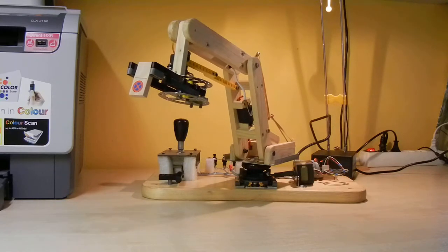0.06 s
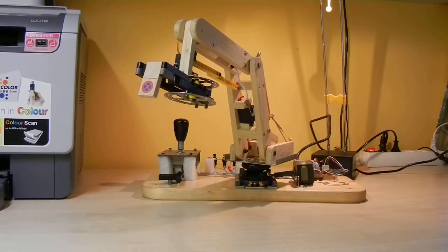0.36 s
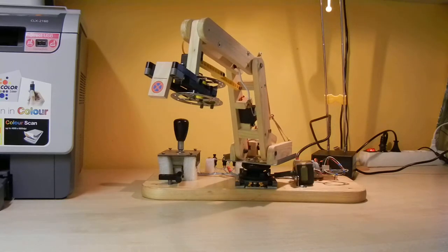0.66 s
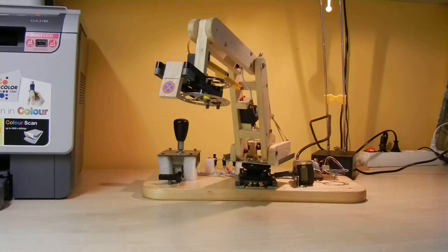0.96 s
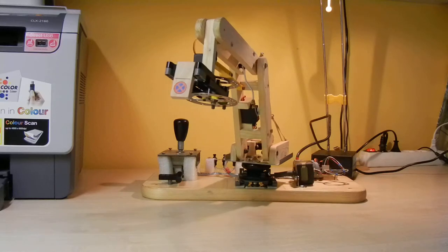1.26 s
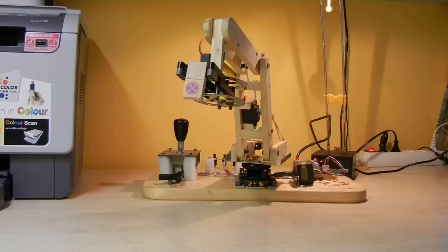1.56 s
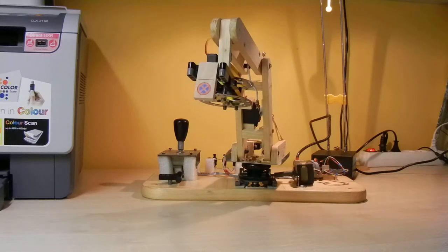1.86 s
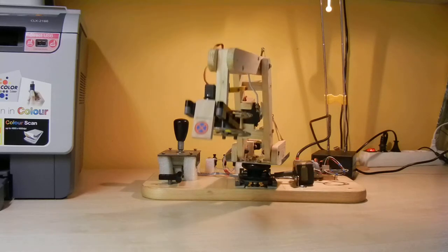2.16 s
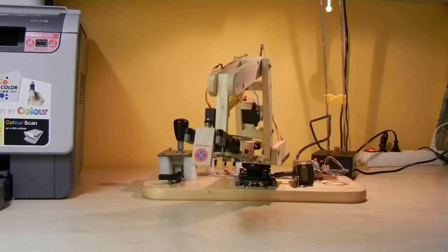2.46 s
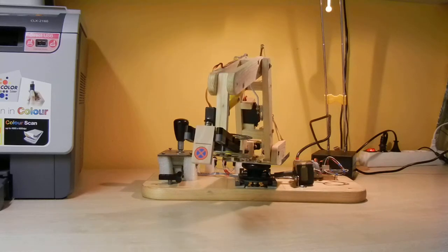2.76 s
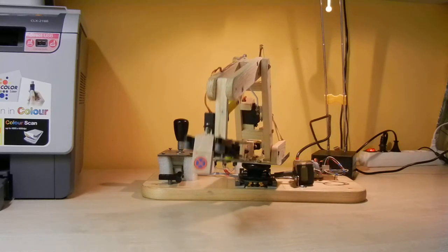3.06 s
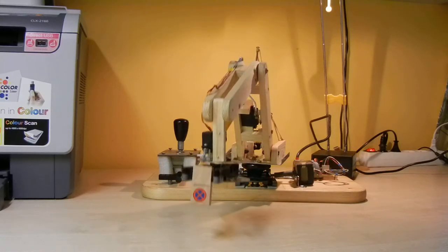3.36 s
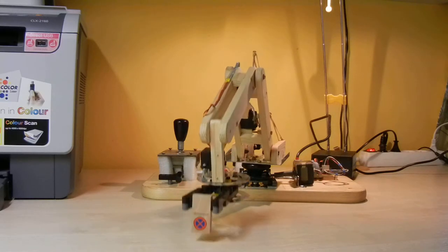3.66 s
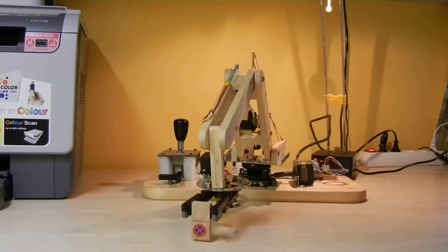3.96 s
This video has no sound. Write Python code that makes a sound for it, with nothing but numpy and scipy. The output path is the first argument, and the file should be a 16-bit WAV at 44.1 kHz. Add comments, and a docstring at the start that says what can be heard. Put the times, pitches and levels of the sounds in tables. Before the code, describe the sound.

A small robot arm buzzes softly and steadily as it turns, with a few faint ticks, stopping with a soft low thud at about 1.9 seconds. Its gears whir with a slightly rising whine until 2.6 seconds. Light ticks and brief whirs follow. Near 3.9 seconds the gripper knocks sharply on the table and bounces once, with a short room echo. Faint hiss and electrical hum continue throughout.

```python
"""On a desk in a small room, a little wooden robot arm works over hiss and mains hum.
Its base motor buzzes while it turns and stops with a soft thud. Then the gears of its servos
(the small motors in the joints) whir and the joints tick as the arm drops.
The gripper knocks on the table and bounces once; the desk and the room throw the knock back."""
import sys
import numpy as np
from scipy import signal
from scipy.fft import rfft, irfft
from scipy.io import wavfile

SR = 44100
rng = np.random.default_rng(int(sys.argv[2]) if len(sys.argv) > 2 else 0)


def generate_wav(signal):
    """Clip the signal to [-1, 1] and save it as 16-bit WAV at the path in sys.argv[1]."""
    frames = np.transpose(np.atleast_2d(signal))
    scaled = np.clip(frames, -1, 1) * 32767
    pcm = np.round(scaled).astype(np.int16)
    wavfile.write(sys.argv[1], SR, pcm)


N = 176400  # 4 seconds

STEP_HZ, STEP_JITTER, TURN_END_S, RUN_DOWN_S = 76.34, .0018, 1.937, .025
BUZZ_DB, BUZZ_RISE_DB_PER_S, RASP_DB = -57.5, .14, -59
# The tones in the buzz. Each row: multiple of the step rate, level in dB relative to BUZZ_DB.
BUZZ_TONES = [(1, -19.5), (2, -7.5), (3, -9), (4, 1), (5, -8.5), (6, -2.5), (7, -8.5), (8, -12), (9, -18.5),
              (10, -13.5), (11, -6.5), (12, -12.5), (19, -19.5), (21, -4), (22, -10.5), (23, -13),
              (24, -11.5), (25, -10.5), (38, -16)]
# The colour of the rasp. Each row: frequency in Hz, relative level in dB.
RASP_COLOUR = [(60, -39), (170, 3.5), (480, 8), (1100, 1), (1700, 11.5), (2100, 5.5), (2900, -2.5),
               (4500, -39.5), (15000, -57)]
def base_motor():
    """The motor moves in even steps, which make a buzz and a rasp that pulses with each step."""
    t = np.arange(N) / SR
    phase = 2 * np.pi * np.cumsum(STEP_HZ * (1 + STEP_JITTER * drift(6.7))) / SR
    buzz = 0
    for multiple, db in BUZZ_TONES:
        wavering = np.sqrt(2) * from_db(db + 1.5 * drift(5.8))
        buzz += wavering * np.sin(multiple * phase + rng.uniform(0, 2 * np.pi))
    buzz *= from_db(BUZZ_DB + BUZZ_RISE_DB_PER_S * (t - TURN_END_S / 2))
    pulses = 1 + .4 * np.cos(phase / 2) ** 4
    rasp = from_db(RASP_DB) * rms_one(noise(RASP_COLOUR, alike=.22) * pulses)
    running = np.clip((TURN_END_S - t) / RUN_DOWN_S + .5, 0, 1)
    return running * (buzz + rasp)


def stop_thud(start_s=1.926, jolt_db=15.5, ring_hz=141, width_hz=6):
    """The frame gives a soft, low shudder as the base stops."""
    return resonate(clicks([(start_s, jolt_db)]), [(ring_hz, width_hz, 0)])


# The gripper's two hits. Each row: start in seconds, strength in dB, cut-off in Hz (lower is softer).
GRIPPER_HITS = [(3.858, 5, 5260), (3.9595, -3.5, 2800)]
# How the gripper and table ring. Each row: pitch in Hz, width in Hz (wider dies sooner), level in dB.
WOOD_RINGS = [(548, 84, 3), (770, 230, -4.5), (1080, 190, -2.5), (1280, 60, -2), (1537, 98, 6.5),
              (2010, 137, 6), (2350, 120, -2), (2590, 83, 6), (3300, 100, 1), (4760, 350, -22),
              (5600, 200, -11), (6400, 140, -25)]
def gripper_knocks():
    """Each hit is a sharp crack and a short wooden ring, followed by near echoes and a duller room."""
    force = sum(butter(clicks([(s, db)]), hz, "low", order=3) for s, db, hz in GRIPPER_HITS)
    crack = from_db(-.5) * butter(force, [1140, 3200], "band")
    ring = from_db(2) * resonate(force, WOOD_RINGS)
    knock = butter(crack + ring, 410, "high")
    near = from_db(5.5) * desk_echoes(knock, alike=.87)
    far = from_db(.5) * room_echoes(butter(knock, 4540, "low"), alike=.91)
    return knock + near + far


def gear_whir(effort, housing, teeth_per_s=6600):
    """Thousands of tiny tooth hits ring a servo's case, louder the harder the servo works."""
    teeth = (rng.random(N) < teeth_per_s / SR) * rng.choice([-1, 1], N)
    teeth = teeth * from_db(3.5 * rng.standard_normal(N))  # no two hits are equally hard
    whir = rms_one(resonate(teeth, housing))
    return whir * from_db(in_time(effort) + .9 * drift(30))


# How hard the shoulder works. Each row: time in seconds, level in dB.
SHOULDER_EFFORT = [(2.225, -83), (2.258, -52), (2.345, -52.5), (2.38, -49), (2.48, -45), (2.55, -48),
                   (2.6, -56), (2.65, -77), (3.57, -80), (3.605, -54), (3.622, -46.5), (3.645, -60),
                   (3.668, -49), (3.72, -72), (3.855, -49.5), (3.872, -41), (3.92, -68), (3.96, -54),
                   (3.985, -53.5)]
# How its case rings. Each row: pitch in Hz, width in Hz, relative level in dB.
SHOULDER_RINGS = [(1700, 1400, -9), (2635, 170, 9), (3660, 160, 2.5), (3950, 300, 2), (5770, 1700, 3),
                  (6850, 270, -10), (8250, 130, -3), (9900, 1600, -3), (12700, 1700, -6.5),
                  (12900, 2300, -3), (15000, 2100, -28)]
def shoulder_servo():
    """The shoulder whirs as it drops the arm and takes the jolt of each knock."""
    return gear_whir(SHOULDER_EFFORT, SHOULDER_RINGS)


# How fast the teeth of the fastest gear meet. Each row: time in seconds, pitch in Hz.
WHINE_PITCH = [(2.25, 5800), (2.4, 6150), (2.5, 6450), (2.6, 6430)]
def gear_whine(width_hz=240):
    """The shoulder's fastest gear sings a rough note and its octave, rising as the arm gains speed."""
    phase = 2 * np.pi * np.cumsum(in_time(WHINE_PITCH)) / SR
    note, octave = (drift(k * width_hz) * np.cos(k * phase) + drift(k * width_hz) * np.sin(k * phase)
                    for k in (1, 2))
    return from_db(in_time(SHOULDER_EFFORT) - 13) * (note + from_db(-9) * octave)


# How hard the elbow works. Each row: time in seconds, level in dB.
ELBOW_EFFORT = [(1.92, -78), (1.985, -57.5), (2.1, -55.5), (2.2, -55.5), (2.4, -52.5), (2.6, -62),
                (2.7, -85)]
# How its case rings. Each row: pitch in Hz, width in Hz, relative level in dB.
ELBOW_RINGS = [(1743, 53, 2), (2250, 350, -3.5), (2630, 290, -3), (3400, 620, -10), (12200, 1300, -9),
               (13900, 1300, -23)]
def elbow_servo():
    """The elbow whirs quietly as it creeps along."""
    return gear_whir(ELBOW_EFFORT, ELBOW_RINGS)


def servos(split_hz=8700):
    """Both servos echo off the desk; their highest sounds reach left and right by different paths."""
    whir = elbow_servo() + shoulder_servo() + gear_whine()
    lows = butter(whir, split_hz, "low", order=3)
    highs = desk_echoes(butter(whir, split_hz, "high", order=3), alike=.3)
    return lows + highs + from_db(-5) * desk_echoes(whir, alike=-.028)


# The slips of the joints. Each row: start in seconds, strength in dB.
JOINT_SLIPS = [(.9995, -35), (1.201, -46), (1.6035, -35.5), (1.7545, -44), (1.98, -45), (2.06, -43),
               (2.205, -39), (2.903, -38.5), (2.908, -52), (3.378, -41), (3.4735, -40), (3.617, -36),
               (3.77, -37.5), (3.774, -43), (3.869, -33)]
def joint_ticks(fade_s=.014):
    """A loose joint slips with a short, gritty tick, also when a knock jolts the arm."""
    decay = from_db(-60 / (fade_s * SR))  # falls 60 dB in fade_s
    slips = signal.lfilter([1], [1, -decay], clicks(JOINT_SLIPS) + 1e-18)
    ticks = butter(slips * rng.standard_normal(N), [900, 8360], "band", order=1)
    echoes = desk_echoes(ticks, alike=-.28) + from_db(-14) * room_echoes(ticks, alike=.2)
    return ticks + from_db(-7) * echoes


# How loud the hum is. Each row: time in seconds, level in dB.
HUM_LEVEL = [(0, -65), (.8, -59), (1.4, -64.5), (1.9, -66), (2.03, -54.5), (2.18, -58), (2.42, -55),
             (2.52, -65), (3.04, -60), (3.13, -52.5), (3.24, -46.5), (3.28, -56), (3.46, -50),
             (3.56, -53.5), (3.63, -50.5), (3.74, -46), (4, -46.5)]
def mains_hum(hum_hz=100):
    """The mains power makes a wavering hum that swells as the arm drops, with faint steady overtones."""
    phase = 2 * np.pi * hum_hz * np.arange(N) / SR
    overtones = sum(np.sin(k * phase + rng.uniform(0, 2 * np.pi)) for k in (4, 7))
    hum = from_db(in_time(HUM_LEVEL) + 2.5 * drift(13)) * np.sin(phase + .11 * drift(1.8))
    return np.sqrt(2) * (hum + from_db(-75) * overtones)


# The colour of the hiss. Each row: frequency in Hz, relative level in dB.
HISS_COLOUR = [(20, -36), (45, -1.5), (75, -0.5), (105, 7), (160, 6), (230, -2), (420, 2.5), (900, -1),
               (1700, 0), (2700, 0), (4500, -9.5), (8000, -11), (15500, -13.5)]
# How wide it sounds. Each row: frequency in Hz, how alike left and right are (1 same, 0 unrelated).
HISS_LIKENESS = [(30, 0.32), (70, 0.36), (130, 0.42), (290, 0.17), (1400, 0.39), (3100, 0.27), (6800, 0.14),
                 (15000, 0.041)]
def room_hiss():
    """A soft, steady hiss fills the room from both sides."""
    return from_db(-51.5) * noise(HISS_COLOUR, per_bin(HISS_LIKENESS))


NEAR_ECHOES_S, ROOM_FADE_S = .0135, .42
def desk_echoes(x, alike):
    """Things on the desk scatter the sound in a brief burst."""
    return diffuse(x, np.ones(int(NEAR_ECHOES_S * SR) + 1), alike)


def room_echoes(x, alike):
    """The room's echoes build up quickly, then fall 60 dB in ROOM_FADE_S."""
    t = np.arange(SR // 2) / SR
    return diffuse(x, np.minimum(t / NEAR_ECHOES_S, 1) * from_db(-60 * t / ROOM_FADE_S), alike)


def diffuse(x, envelope, alike):
    """Many random echoes whose strength follows the envelope."""
    response = pair(*rng.standard_normal((2, len(envelope))), alike) * envelope / np.linalg.norm(envelope)
    return signal.fftconvolve(x[None], response, axes=1)[:, :N]


def from_db(db):
    """Turn decibels into a number to multiply by."""
    return 10 ** (np.asarray(db) / 20)


def rms_one(x):
    """Scale a signal so its average size (rms) is 1."""
    return x / np.sqrt(np.mean(x ** 2) + 1e-20)


def in_time(rows):
    """Join (seconds, value) points with straight lines."""
    return np.interp(np.arange(N) / SR, *np.transpose(rows))


def per_bin(points):
    """Join (Hz, value) points to get a value at every frequency."""
    hz, value = np.transpose(points)
    return np.interp(np.log(np.fft.rfftfreq(N, 1 / SR) + 1), np.log(hz), value)


def drift(rate_hz):
    """A random wobble of size about 1, mostly slower than rate_hz."""
    hz = np.fft.rfftfreq(N, 1 / SR)
    return rms_one(irfft(rfft(rng.standard_normal(N)) / (1 + (hz / rate_hz) ** 2), N))


def pair(mid, side, alike):
    """Mix two unrelated signals into left and right; alike=1 makes both the same."""
    alike = np.clip(alike, -1, 1)
    return np.sqrt((1 + alike) / 2) * mid + np.sqrt((1 - alike) / 2) * side * [[1], [-1]]


def noise(colour, alike):
    """Stereo noise of the given colour and average size 1."""
    mid, side = rfft(rng.standard_normal((2, N)))
    return rms_one(irfft(pair(mid, side, alike) * from_db(per_bin(colour)), N))


def butter(x, hz, kind, order=2):
    """Keep the lows, the highs or a band; a higher order cuts more steeply."""
    return signal.sosfilt(signal.butter(order, hz, kind, fs=SR, output="sos"), x + 1e-18)


def clicks(rows):
    """One click for each (seconds, dB) row."""
    out = np.zeros(N)
    for s, db in rows:
        out[int(s * SR)] += from_db(db)
    return out


def resonate(x, rings):
    """Let a signal ring at each (pitch in Hz, width in Hz, dB) row."""
    out = 0
    for hz, width, db in rings:
        r = np.exp(-np.pi * width / SR)
        feed = np.array([1, 0, -1]) * (1 - r * r) / 2
        feedback = [1, -2 * r * np.cos(2 * np.pi * hz / SR), r * r]
        out = out + from_db(db) * signal.lfilter(feed, feedback, x + 1e-18)
    return out


def scene():
    """The arm over hum and hiss, all a touch louder on the left."""
    arm = base_motor() + stop_thud() + servos() + joint_ticks() + gripper_knocks()
    return (arm + mains_hum() + room_hiss()) * from_db([[.32], [-.32]])


def record(dry, cutoff_hz=15750):
    """The very highest sounds are cut off steeply."""
    return signal.sosfilt(signal.ellip(12, .1, 80, cutoff_hz, fs=SR, output="sos"), dry)


dry = scene()
out = record(dry)
generate_wav(out)
```